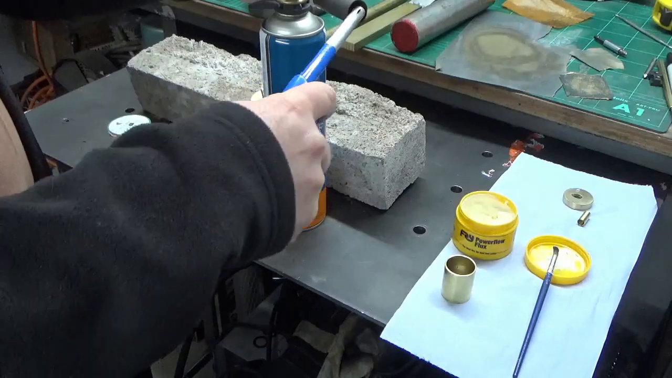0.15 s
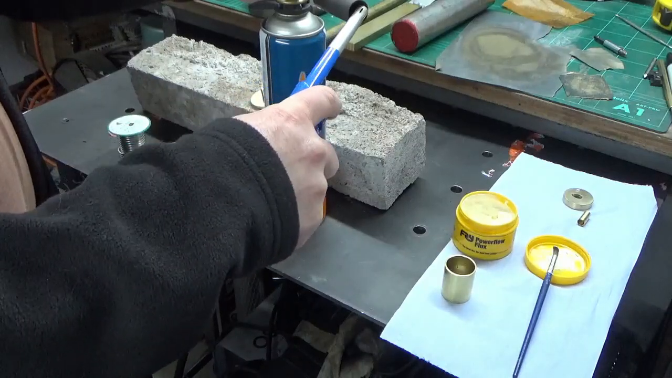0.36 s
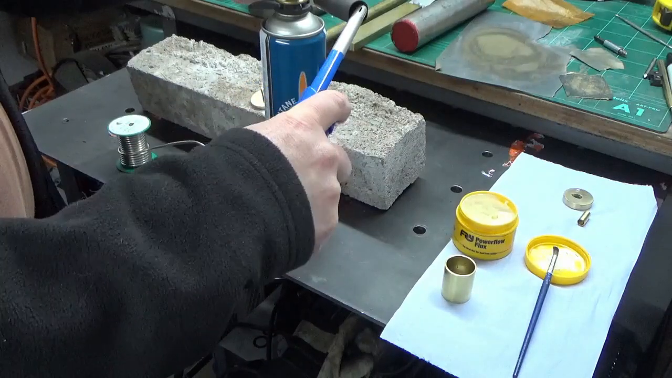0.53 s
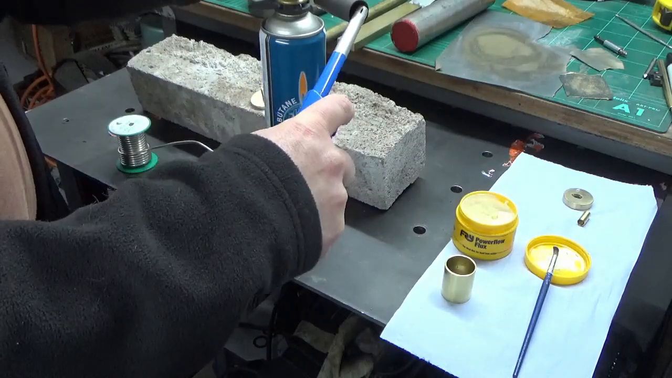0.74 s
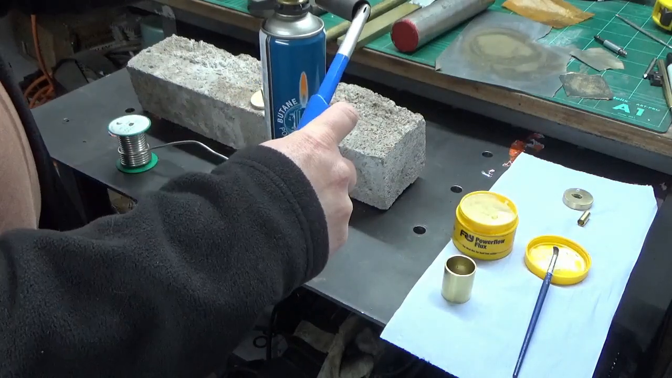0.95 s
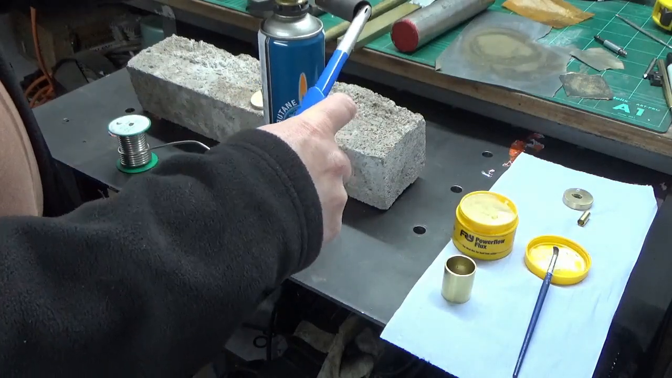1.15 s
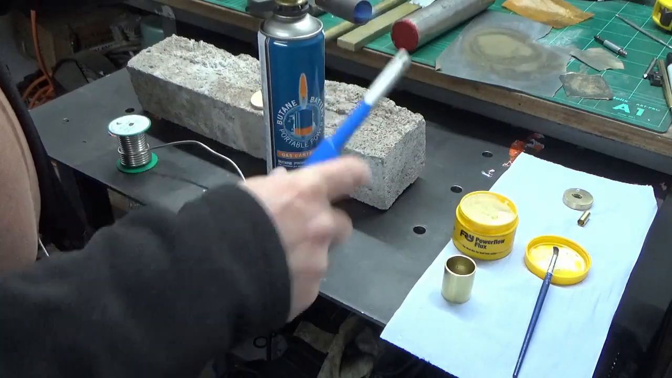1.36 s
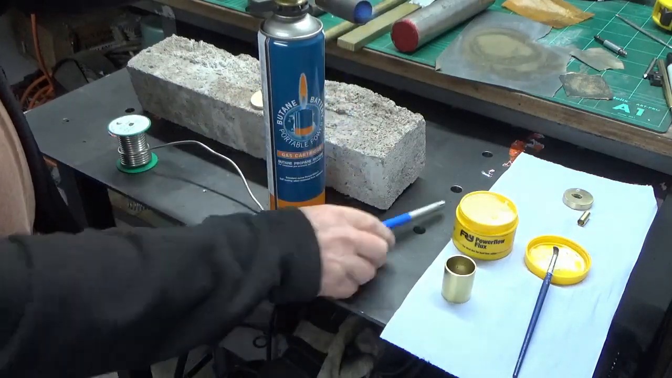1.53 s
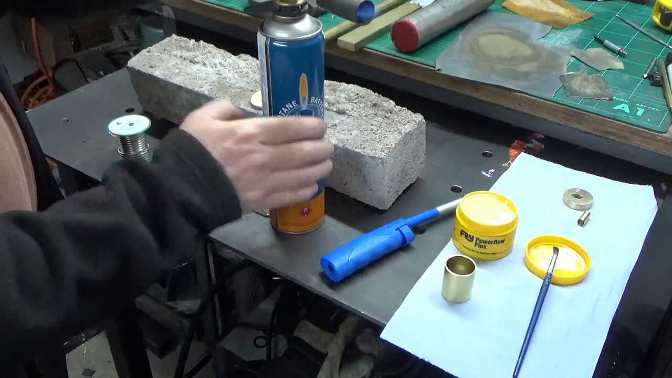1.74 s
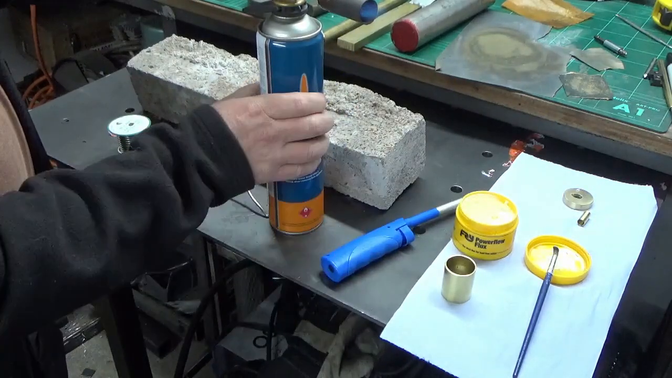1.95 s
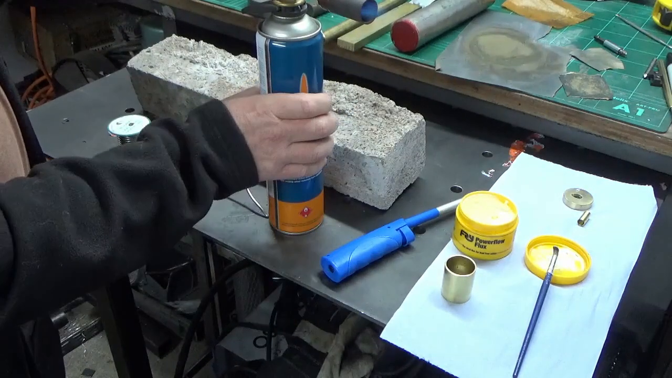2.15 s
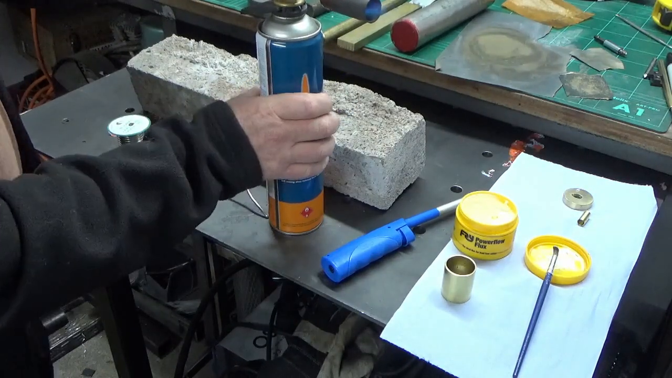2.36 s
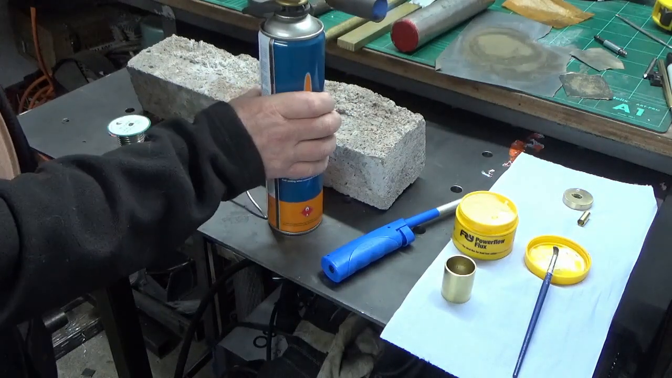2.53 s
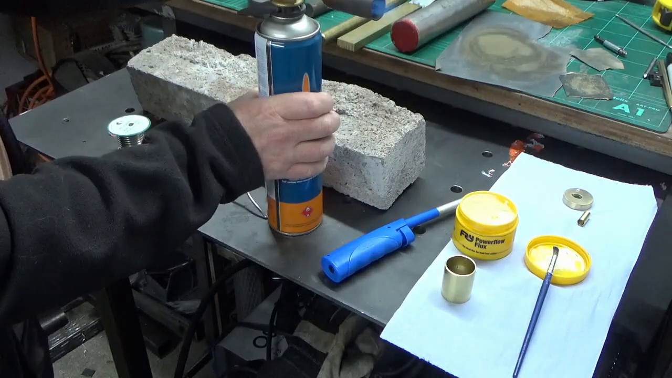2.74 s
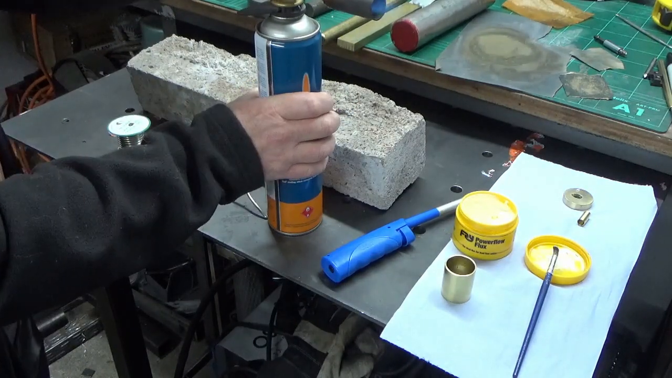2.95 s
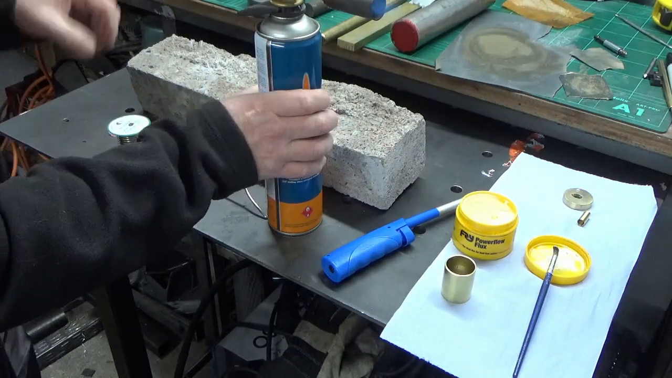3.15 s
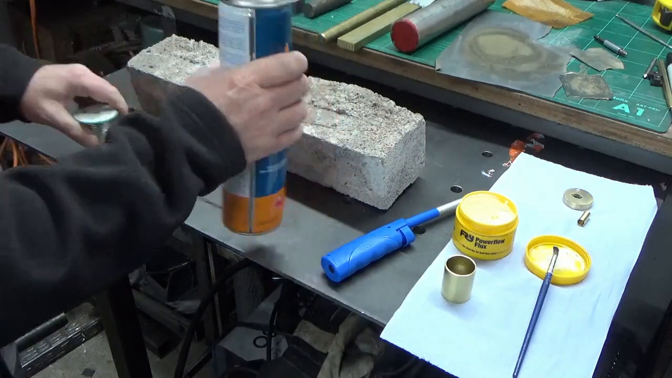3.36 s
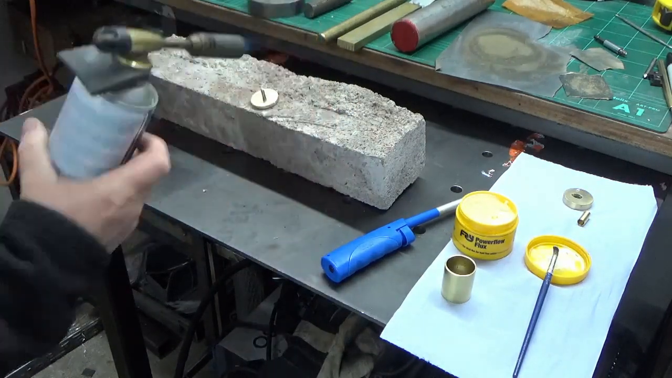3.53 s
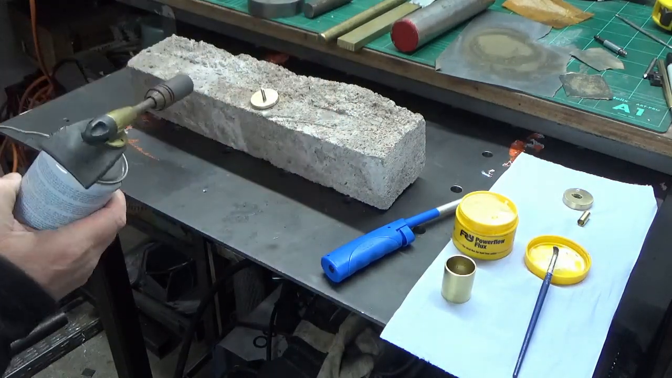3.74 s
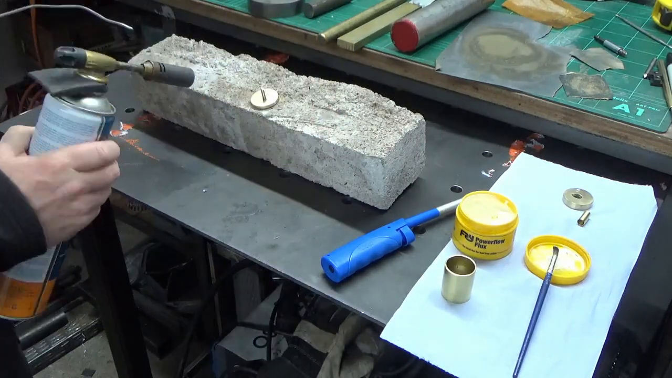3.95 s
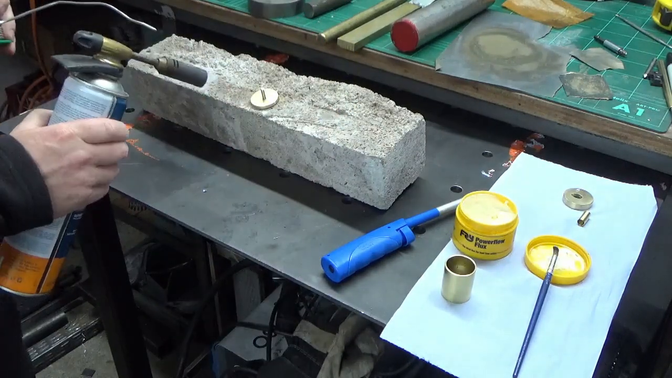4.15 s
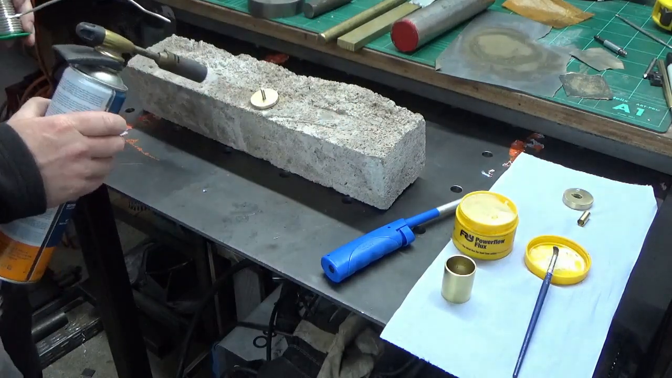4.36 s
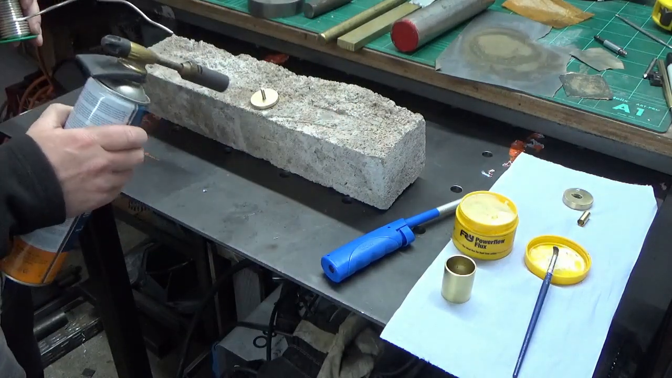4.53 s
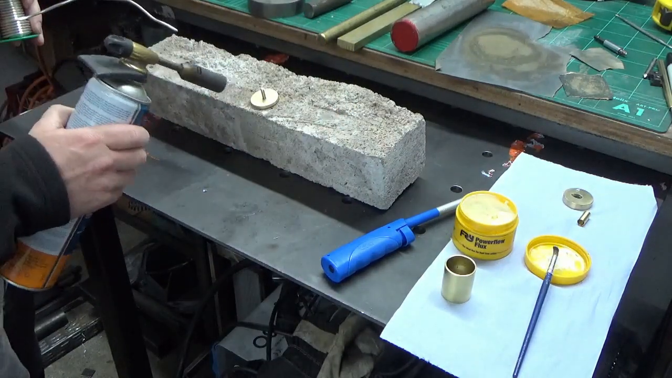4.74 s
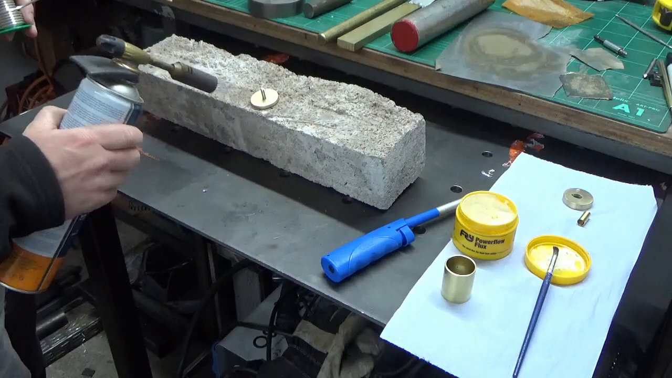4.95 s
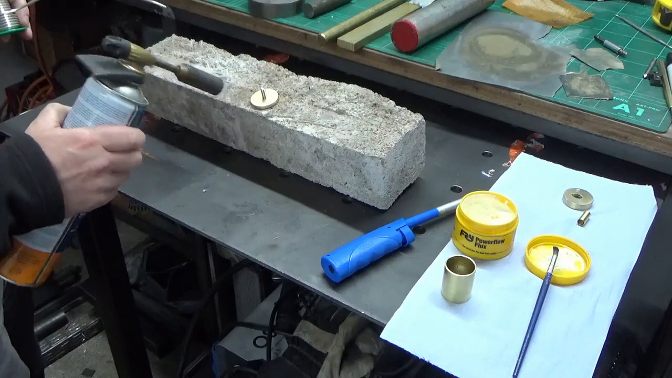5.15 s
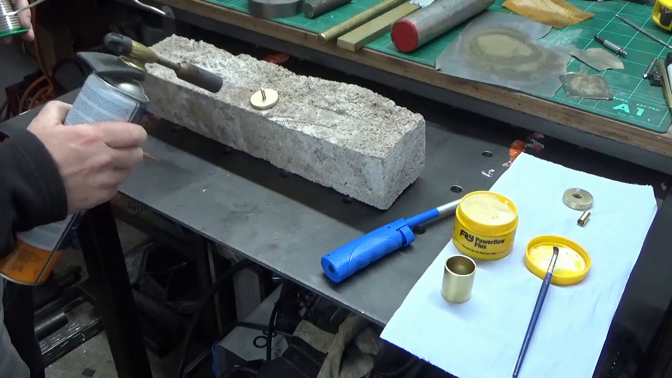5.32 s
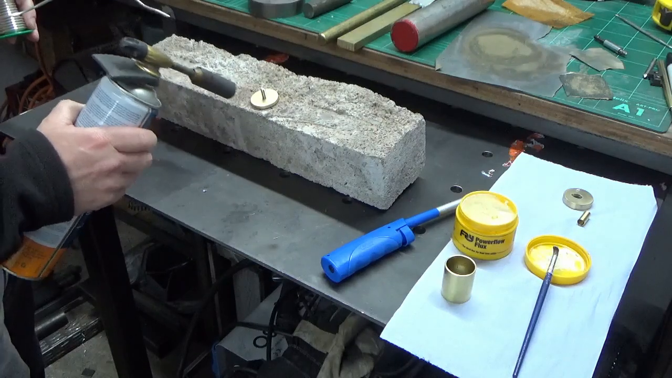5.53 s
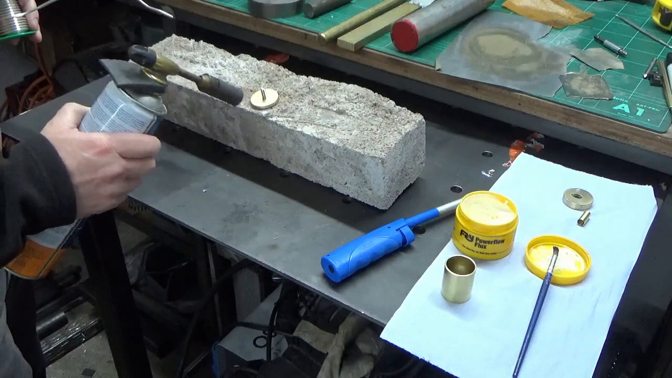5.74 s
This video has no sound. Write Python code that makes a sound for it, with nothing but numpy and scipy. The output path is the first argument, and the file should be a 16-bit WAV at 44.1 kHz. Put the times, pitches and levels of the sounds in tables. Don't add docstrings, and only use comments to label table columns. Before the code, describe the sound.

Close, dry stereo sound at a steel bench: rapid hard clicks from a trigger lighter, with small spring chatter and plastic creaks over faint air hiss. A torch ignites in a flutter of pops, then burns in a broad, rough hiss. It surges suddenly midway, eases a little, sweeps brighter then duller as the torch is moved, and holds steady to the end.

```python
import sys
import numpy as np
from scipy import signal
from scipy.fft import rfft, irfft, next_fast_len
from scipy.io import wavfile
from scipy.ndimage import uniform_filter1d

SR = 44100
rng = np.random.default_rng(int(sys.argv[2]) if len(sys.argv) > 2 else 0)


def makeup_ratio(level_db):
    decades = np.asarray(level_db, float) / 20
    return 10 ** decades


def wrap_up_sound(samples):
    columns = np.atleast_2d(samples).T
    tamed = np.clip(columns, -1, 1)
    steps = np.round(tamed * 32767).astype(np.int16)
    wavfile.write(sys.argv[1], SR, steps)


N = 259749
TIME_S = np.arange(N) / SR
LIT_S = 1.281


def rms_one(x):
    return x / np.sqrt(np.mean(x ** 2) + 1e-20)


def in_time(rows):
    start_s, *columns = np.transpose(rows)
    return [np.interp(TIME_S, start_s, column) for column in columns]


def coloured(x, spectrum, rings=()):
    size = next_fast_len(N)
    hz = np.maximum(np.arange(size // 2 + 1) * SR / size, 1)
    point_hz, point_db = np.transpose(spectrum)
    db = np.interp(np.log(hz), np.log(point_hz), point_db)
    for centre_hz, width_hz, lift_db in rings:
        db = db + lift_db / (1 + (2 * (hz - centre_hz) / width_hz) ** 2)
    return irfft(rfft(x, size) * makeup_ratio(db), size)[..., :N]


def band(x, low_hz, high_hz):
    return signal.sosfilt(signal.butter(2, [low_hz, high_hz], "band", fs=SR, output="sos"), x)


def top_cut(x, hz=15620):
    return signal.sosfilt(signal.ellip(10, .3, 70, hz, fs=SR, output="sos"), x)


def drift(rate_hz):
    r = np.exp(-2 * np.pi * rate_hz / SR)
    walk = signal.lfilter([1], [1, -2 * r, r * r], rng.standard_normal(N + SR))
    return rms_one(walk[SR:])


def ring(x, hz, t60_s):
    r, w = makeup_ratio(-60 / (t60_s * SR)), 2 * np.pi * hz / SR
    return signal.lfilter([0, np.sin(w)], [1, -2 * r * np.cos(w), r * r], x + 1e-18)


def dying(starts_s, levels_db, t60_s, hold_s=0.):
    out, since_s = np.zeros(N), np.arange(SR // 2) / SR
    for start_s, db in zip(starts_s, levels_db):
        part = out[round(start_s * SR):][:len(since_s)]
        part += makeup_ratio(db - 60 * np.maximum(since_s - hold_s, 0) / t60_s)[:len(part)]
    return out


def late(x, lag_ms):
    return np.interp(np.arange(N) - lag_ms * SR / 1000, np.arange(N), x)


def bump(centre_s, width_s):
    return np.exp(-.5 * ((TIME_S - centre_s) / width_s) ** 2)


# hz, level_db
STILL_AIR_TONE = [(12, -38), (20, 5), (717, 2.5), (1370, 5.5), (1620, 2.5), (4120, 0), (4480, 1),
                  (5610, -2), (6110, 8), (7230, 8), (9060, 1), (14600, 2), (16800, -30)]
STILL_AIR_DB = -60.5


def still_air():
    air = rng.standard_normal((3, N))
    return makeup_ratio(STILL_AIR_DB) * rms_one(coloured(air[:2] * 0.29 + air[2], STILL_AIR_TONE))


RUMBLE_DB = -72


def bench_rumble(way):
    air = rng.standard_normal((3, N))
    rumble = makeup_ratio(RUMBLE_DB) * rms_one(band(air[:2] * 0.85 + air[2], 56, 82)) * makeup_ratio([[1.5], [-1.5]])
    return rumble * (.5 + 0.27 * (TIME_S > LIT_S) + .4 * way)


SHOP_T60_S, BENCH_T60_S, WALL_CUT_HZ = 0.27, .09, 13000


def reverb(x, t60_s):
    t = np.arange(int(.3 * SR)) / SR
    noise = rng.standard_normal((2, len(t)))
    dull = band(noise, 140, WALL_CUT_HZ / 3)
    tail = noise * makeup_ratio(-90 * t / t60_s) + dull * makeup_ratio(-60 * t / t60_s)
    tail *= np.clip(t / 0.0017, 0, 1)
    return signal.fftconvolve(x[None], rms_one(tail) / np.sqrt(len(t)), axes=1)[:, :N]


# start_s, level_db, t60_s, bright_db
SQUEEZES = [(.0155, -72, 0.1, 5), (.085, -59, 0.41, -8), (.31, -58.5, 0.97, -17), (.655, -58.5, 0.28, -9),
            (0.6645, -61.5, 0.13, 1.5), (.74, -54, 0.17, -17), (1.095, -50, 0.36, -21),
            (1.101, -65.5, 0.19, 7.5), (1.237, -62.5, 0.13, 2.5), (1.258, -53.5, 0.12, -3)]
# centre_hz, width_hz, level_db
GRIP_MODES = [(740, 590, -8.5), (1890, 570, -2), (3650, 1200, -0.5), (5200, 910, -1), (8500, 4900, 0),
              (12200, 400, 0), (14900, 800, 0)]


def squeezes():
    out = 0
    for hz, width_hz, mode_db in GRIP_MODES:
        noise = rng.standard_normal(N)
        creak = rms_one(band(noise, max(hz - width_hz / 2, 300), hz + width_hz / 2))
        rub = 0
        for start_s, level_db, t60_s, bright_db in SQUEEZES:
            db = level_db + bright_db * np.log2(hz / 750) / 2
            rub = rub + dying([start_s], [db], t60_s, hold_s=0.0041)
        out = out + makeup_ratio(mode_db) * creak * uniform_filter1d(rub, size=30)
    return out


# start_s, peak_db, pitch_hz
TICKS = [(.0165, -44, 6050), (.165, -43, 4000), (.243, -40, 4000), (.260, -24, 6000), (.273, -27, 9000),
         (.329, -32, 8000), (.318, -41.5, 3500), (.4277, -30, 4500), (.477, -50, 3500), (.575, -32, 4000),
         (.592, -38, 9000), (.752, -40, 6000), (.873, -44, 4000), (1.0005, -31, 6000), (1.088, -49, 3000),
         (1.177, -21, 5970)]
# start_s, level_db
PINGS = [(.262, -58), (.28, -54), (.577, -50), (.945, -48), (1.009, -48), (1.14, -53), (1.178, -52)]
SPRING_HZ, SPRING_T60_S = 4990, 0.11


def ticks():
    out, pings = np.zeros(N), np.zeros(N)
    t = np.arange(200) / SR
    for start_s, peak_db, hz in TICKS:
        click = makeup_ratio(peak_db - 60 * t * hz / 6.3) * np.sin(2 * np.pi * hz * t)
        out[round(start_s * SR):][:200] += click
    for start_s, db in PINGS:
        pings[round(start_s * SR)] = makeup_ratio(db)
    return band(out, 1600, 14000) + ring(pings, SPRING_HZ, SPRING_T60_S)


# pitch_hz, level_db, t60_s
BARREL_MODES = [(3880, -33, 0.059), (5170, -38, 0.072), (5300, -28, .04), (7100, -25, .1),
                (8000, -5.5, 0.036), (7250, -32, 0.092), (10800, -23, 0.08), (12560, -26.5, .1),
                (13700, -30, .1), (15580, -22, .05)]
BURST_DB, BURST_T60_S = -6.5, 0.017


def trigger(events, tone, crack_hz, rattle_t60_s, hold_s, ring_db):
    start_s, peak_db, rattle_db = np.transpose(events)
    start_s = start_s + .001
    blows = .15 * rng.standard_normal(N) * dying(start_s, peak_db, .006)
    blows[np.round(start_s * SR).astype(int)] += 2.6 * makeup_ratio(peak_db)
    crack = 0.48 * band(blows, *crack_hz)
    chatter = rng.standard_normal(N) * makeup_ratio(1.7 * drift(710))
    rattle = dying(start_s, rattle_db, rattle_t60_s, hold_s)
    rattle += dying(start_s, rattle_db + BURST_DB, BURST_T60_S)
    drive = 0.11 * blows + rattle * chatter
    rings = sum(makeup_ratio(db) * ring(drive, hz, t60_s) for hz, db, t60_s in BARREL_MODES)
    return crack + top_cut(rattle * rms_one(coloured(chatter, tone)) + makeup_ratio(ring_db) * rings)


# start_s, peak_db, rattle_db
RETURNS = [(0.1171, -9, -35), (0.2778, -12, -35.5), (0.4394, -8.5, -39), (0.598, -10, -36),
           (0.8006, -8.5, -35.5), (1.0076, -11.5, -33), (1.1967, -10, -36), (1.3538, -13, -34)]
# hz, level_db
RETURN_TONE = [(180, -67), (300, -38), (1140, -18), (1790, -24), (2640, -17), (4530, -9.5), (5010, -12.5),
               (11200, 1.5), (15200, -5.5), (16800, -35.5)]


def returns():
    return trigger(RETURNS, RETURN_TONE, crack_hz=(6500, 13000), rattle_t60_s=0.057,
                   hold_s=0.0012, ring_db=-31)


# start_s, peak_db, rattle_db
SNAPS = [(0.038, -20, -32), (0.2044, -19, -33), (0.3683, -17, -32), (0.5212, -20, -31.5),
         (0.7166, -21, -32.5), (0.9238, -28, -31.5), (1.125, -19, -32.5), (1.2768, -15, -32)]
# hz, level_db
SNAP_TONE = [(120, -58), (200, -30), (819, -25), (1480, -22), (1660, -23), (2900, -23.5), (4860, -3.5),
             (6790, -4.5), (8020, 2.5), (8800, -8.5), (11000, 0.5), (15900, -7), (16800, -48)]


def snaps():
    return trigger(SNAPS, SNAP_TONE, crack_hz=(1800, 16500), rattle_t60_s=0.15,
                   hold_s=.008, ring_db=-26.0)


# start_s, peak_db, width_ms
POPS = [(1.285, -30, .09), (1.2935, -30, .09), (1.298, -25, .15), (1.307, -28, .15), (1.3252, -21, .16),
        (1.333, -31, .3), (1.341, -27, .45), (1.351, -29, .4), (1.3658, -24, .13), (1.373, -30, .3),
        (1.382, -31, .15)]
# level_db, pitch_hz, t60_s
WHOOMP = (-43.5, 230, 0.42)
NOZZLE_HZ, NOZZLE_T60_S = 2050, .02


def ignition():
    out = 0
    for start_s, peak_db, width_ms in POPS:
        u = np.clip((TIME_S - start_s) / width_ms * 1000, -6, 6)
        out = out - makeup_ratio(peak_db) * np.exp(-u * u / 2)
    nozzle = ring(band(out, 600, 6000), NOZZLE_HZ, NOZZLE_T60_S)
    pops = band(out, 230, 6000) + makeup_ratio(-15) * nozzle
    db, hz, t60_s = WHOOMP
    air = rms_one(band(rng.standard_normal(N), hz * 0.54, hz * 1.8))
    swell = air * dying([LIT_S], [db], t60_s, hold_s=0.029)
    return pops + uniform_filter1d(swell, 40)


# start_s, level_db
GAS = [(1.42, -37.5), (1.6, -36.5), (1.93, -36), (2.1, -33.5), (2.22, -35), (2.612, -34.5), (2.64, -28),
       (2.88, -29.5), (3.3, -32.5), (3.6, -32.5), (3.9, -32.5), (4.02, -33.5), (4.15, -31.5), (5.0, -31.5),
       (5.3, -31.5), (5.89, -31)]
# centre_s, lift_db, half_length_s
SPURTS = [(1.675, 1.5, .02), (2.28, 2, 0.013), (3.36, 2, 0.04), (3.48, 2, 0.019), (5.173, 1, 0.01),
          (5.63, 4.5, 0.006)]
MEAN_GAS_DB = -34
ROAR_DB, ROAR_FOLLOWS, ROAR_AIMED_DB = -37.5, 0.26, 0.46
JET_DB, JET_FOLLOWS, JET_AIMED_DB = -42.5, 1.13, -.5
TOP_DB, TOP_FOLLOWS, TOP_AIMED_DB = -43.0, 1.2, -1.1
FACING_S, FACING_WIDTH_S, FACING_DB = 3.46, 0.054, 5
AVERTED_S, AVERTED_WIDTH_S, AVERTED_DB = 3.73, 0.088, -3.5
ROAR_PAN_DB, PAN_DB_PER_S, AIMED_PAN_DB = 1.4, 1.85, 1.5


def burning(way):
    hiss_db = in_time(GAS)[0] + sum(db * bump(s, width_s) for s, db, width_s in SPURTS)
    flow_db = hiss_db - MEAN_GAS_DB
    beam_db = FACING_DB * bump(FACING_S, FACING_WIDTH_S) + AVERTED_DB * bump(AVERTED_S, AVERTED_WIDTH_S)
    roar_db = ROAR_DB + ROAR_FOLLOWS * flow_db + ROAR_AIMED_DB * way
    jet_db = JET_DB + JET_FOLLOWS * flow_db + JET_AIMED_DB * way + beam_db
    top_db = TOP_DB + TOP_FOLLOWS * flow_db + TOP_AIMED_DB * way
    pan_db = ROAR_PAN_DB + PAN_DB_PER_S * np.clip(TIME_S - LIT_S, 0, 1.8) + AIMED_PAN_DB * way
    return [roar_db, hiss_db, jet_db, top_db], pan_db


# hz, level_db
UPRIGHT_TONE = [(71, -69), (120, -27.5), (184, -33), (260, -9), (442, -5), (781, -6), (958, -12.5),
                (1060, -7.5), (1380, -8), (2040, -7.5), (2820, -13), (3990, -12), (7190, -17), (9000, -16),
                (15600, -14)]
AIMED_TONE = [(71, -77), (120, -55), (266, -22), (470, -4), (576, -7.5), (798, -4), (1130, -17),
              (1220, -6.5), (1530, -11), (1760, -6.5), (3750, -15), (4410, -16.5), (8640, -18.5),
              (9970, -20), (15600, -11)]
# centre_hz, width_hz, lift_db
UPRIGHT_RINGS = [(151, 18, 7.5), (459, 54, 8.5), (629.5, 31, 10), (800, 90, 4), (988, 31, -20.5),
                 (960, 160, 14.5), (1285, 17, 10.5), (1466, 23, 0), (1640, 27, -3), (1780, 62, -6.5),
                 (1990, 140, -0.5), (2270, 33, -3.5), (3200, 58, -6.5), (3200, 170, 3.5), (3500, 58, -3.5),
                 (4140, 26, 4.5), (4410, 58, 2), (4950, 55, 4.5), (6540, 60, 6), (7150, 150, 4),
                 (7400, 330, -4), (8150, 200, 5), (8650, 230, 5), (8800, 200, 7), (10260, 600, 6)]
AIMED_RINGS = [(460, 88, 0.5), (646, 200, 3.5), (804, 41, 9.5), (1044, 66, 16), (1130, 14, -8),
               (1225, 59, 5.5), (1387, 25, 7), (1540, 29, -13), (1650, 55, 4.5), (1760, 43, 5),
               (2030, 25, 0), (2150, 120, 1.5), (2230, 43, 1), (2910, 24, -2), (2835, 155, 10.5),
               (3000, 65, -7), (3380, 59, 9), (3770, 210, -7), (4070, 70, -9.5), (4340, 22, 13),
               (4530, 91, 8.5), (5340, 89, 11.5), (6360, 130, 8.5), (7530, 180, 8), (9900, 570, 10),
               (10930, 1100, 10)]
# start_s, lag_ms, gain
SWING = [(1.3, .48, 0.21), (3.35, .48, 0.053), (3.52, 0.4, 0.25), (3.75, 0.34, 0.46), (3.94, .27, 0.5),
         (4.06, 0.17, 0.29), (4.3, 0.14, .2), (5.89, 0.14, 0.097)]
BLUR_LOSS, BLUR_FILL = .45, .3


def coloured_flame(way):
    burn = rng.standard_normal(N) * makeup_ratio(0.99 * drift(230))
    moving = 4 * way * (1 - way)
    here = (1 - way) * rms_one(coloured(burn, UPRIGHT_TONE, UPRIGHT_RINGS))
    here += way * rms_one(coloured(burn, AIMED_TONE, AIMED_RINGS))
    plain = rms_one(coloured(burn, UPRIGHT_TONE))
    here = (1 - BLUR_LOSS * moving) * here + BLUR_FILL * moving * plain
    lag_ms, gain = in_time(SWING)
    return here + gain * late(band(here, 1050, 4140), lag_ms)


SPLITS_HZ = (920, 8500, 11800)
# start_s, level_db
CATCH = [
    (1.281, -37),
    (1.287, -3),
    (1.32, -6),
    (1.385, -3.5),
    (1.42, 1),
    (5.89, 1),
]


def flame(way):
    levels_db, pan_db = burning(way)
    size = next_fast_len(N)
    hz, whole = np.arange(size // 2 + 1) * SR / size, rfft(coloured_flame(way), size)
    below = [0 * hz] + [1 / (1 + (hz / split_hz) ** 14) for split_hz in SPLITS_HZ] + [1 + 0 * hz]
    lit = makeup_ratio(in_time(CATCH)[0]) * (TIME_S > LIT_S)
    pans_db = [pan_db, 0.25 + 2.15 * way, 0.24 + 1.3 * way, .2 + .6 * way]
    flickers_db = (0.39, 0.6, 0.43, 0.34)
    gust, out = drift(3.7), 0
    for low, high, db, side_db, flicker_db in zip(below, below[1:], levels_db, pans_db, flickers_db):
        x = irfft(whole * (high - low), size)[:N]
        steady = x / np.sqrt(uniform_filter1d(x * x, SR // 3))
        x = steady * makeup_ratio(db + flicker_db * (gust + drift(26.0)))
        out = out + x * lit * makeup_ratio([side_db / 2, -side_db / 2])
    return out


# upright_lag_ms, aimed_lag_ms, left_gain, right_gain, right_extra_ms
ECHOES = [(1.02, 1.235, 0.026, 0.058, -0.043), (1.47, 0.98, 0.095, 0.061, -0.0074),
          (2.21, 1.793, -0.16, -0.11, 0.033), (2.57, 1.565, 0.081, 0.058, -0.048),
          (2.85, 8.3, 0.091, -0.039, 0.053), (4.64, 4.2, 0.052, 0.013, -0.087),
          (5.49, 3.99, 0.049, 0.24, -0.0044), (7.4, 8.6, 0.067, 0.021, 0.31)]
TREMOR, TREMOR_HZ = .015, 1.2


def near_echoes(x, way):
    out, tremor = x.copy(), 1 + TREMOR * drift(TREMOR_HZ)
    for upright_ms, aimed_ms, left_gain, right_gain, extra_ms in ECHOES:
        lag_ms = (upright_ms + way * (aimed_ms - upright_ms)) * tremor
        out[0] += left_gain * late(x[0], lag_ms)
        out[1] += right_gain * late(x[1], lag_ms + extra_ms)
    return out


# start_s, way
CARRY = [
    (0, 0),
    (3.3, 0),
    (3.55, 0.41),
    (3.9, 0.6),
    (4.1, 0.91),
    (4.4, 0.89),
    (5.89, 0.94),
]


def scene():
    way, = in_time(CARRY)
    background = still_air() + bench_rumble(way)
    hand = squeezes() + ticks() + returns() + snaps()
    torch = near_echoes(flame(way) * makeup_ratio(-1.0) + ignition(), way)
    room = makeup_ratio(-6.5) * reverb(hand, SHOP_T60_S)
    room += makeup_ratio(-8.5) * reverb(band(torch.mean(axis=0), 1420, 17500), BENCH_T60_S)
    return hand + top_cut(torch + room + background)


def low_pass(x):
    return signal.sosfilt(signal.butter(12, 17000, fs=SR, output="sos"), x)


def record(dry):
    mix = top_cut(dry, hz=16600)
    return low_pass(mix)


dry = scene()
out = record(dry)
wrap_up_sound(out)
```